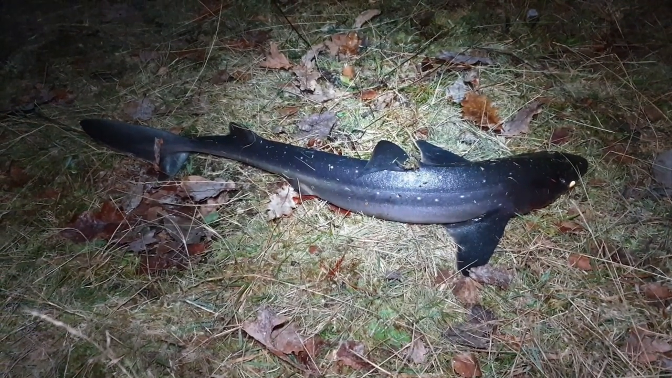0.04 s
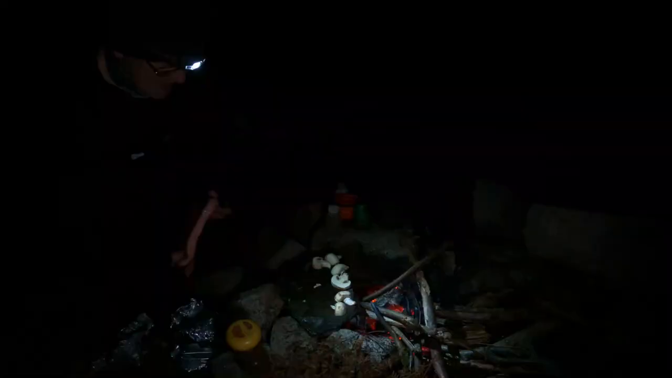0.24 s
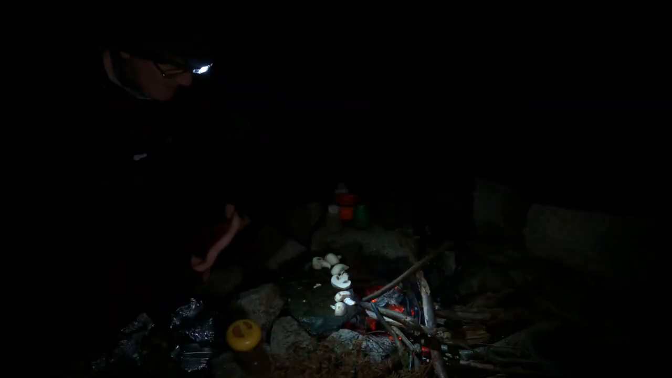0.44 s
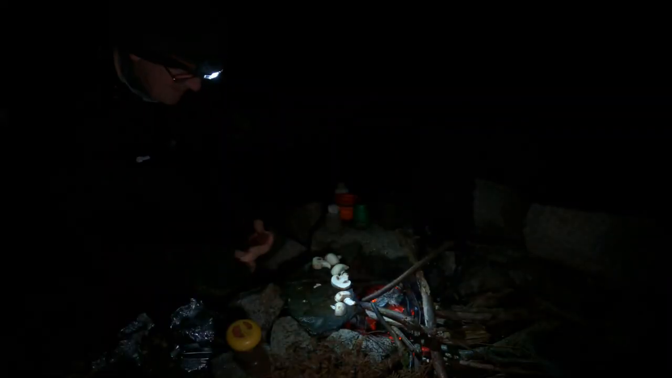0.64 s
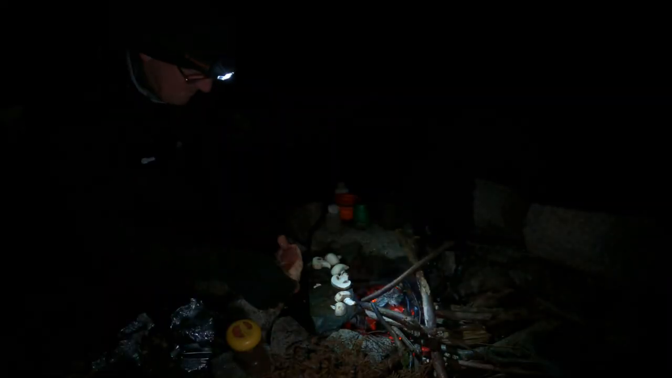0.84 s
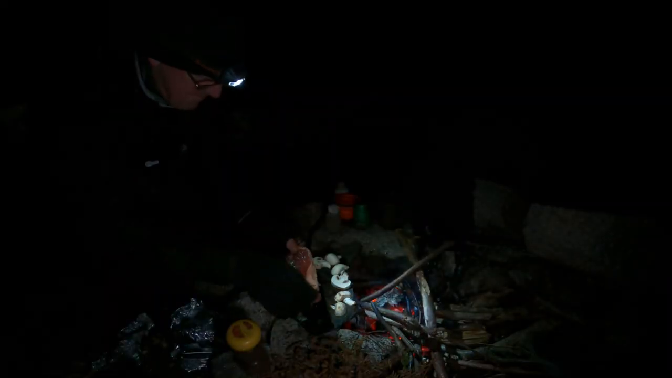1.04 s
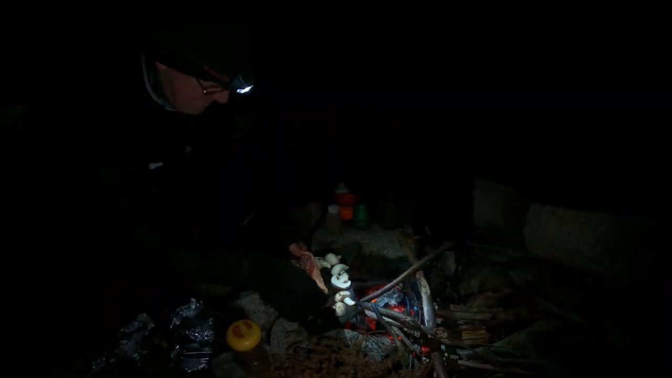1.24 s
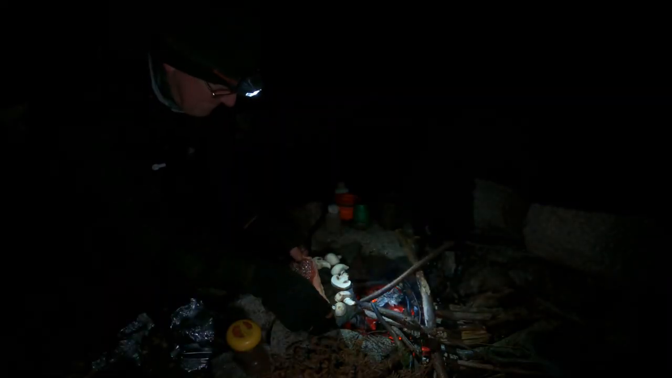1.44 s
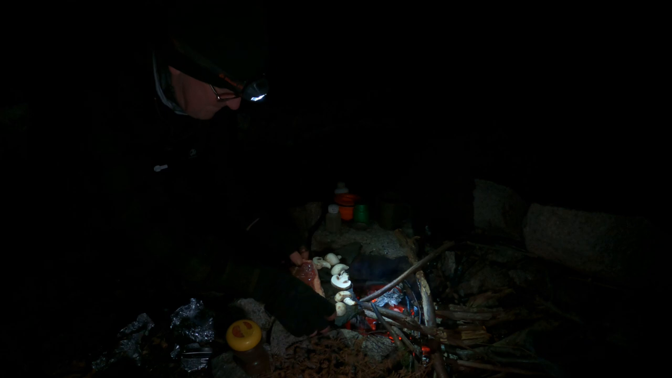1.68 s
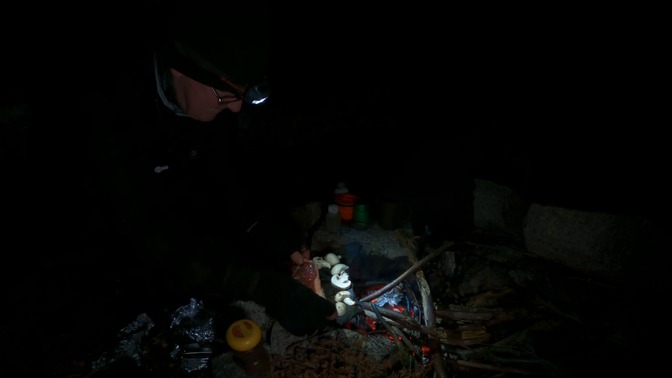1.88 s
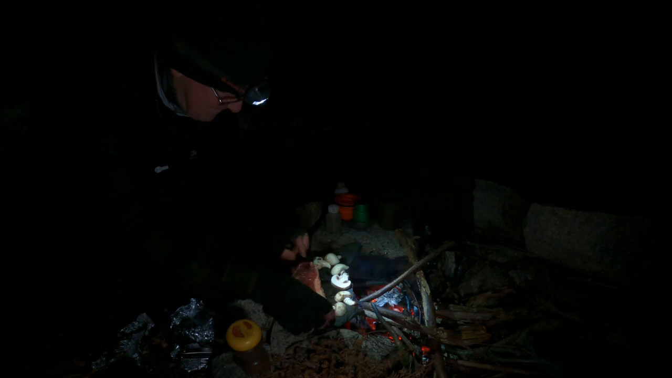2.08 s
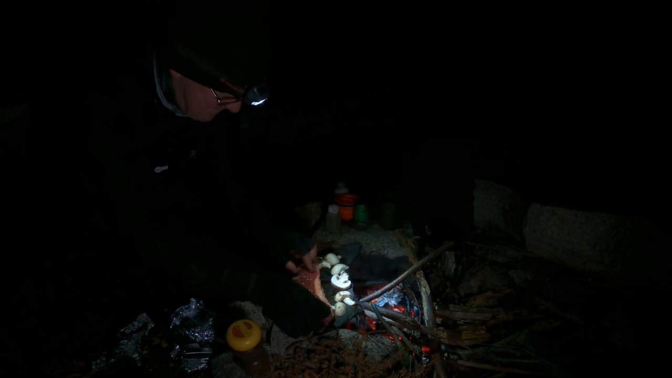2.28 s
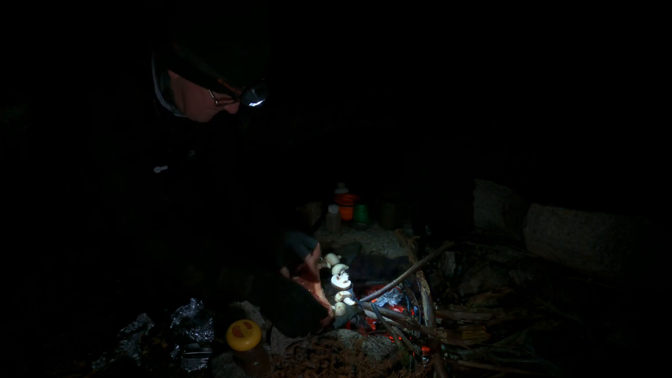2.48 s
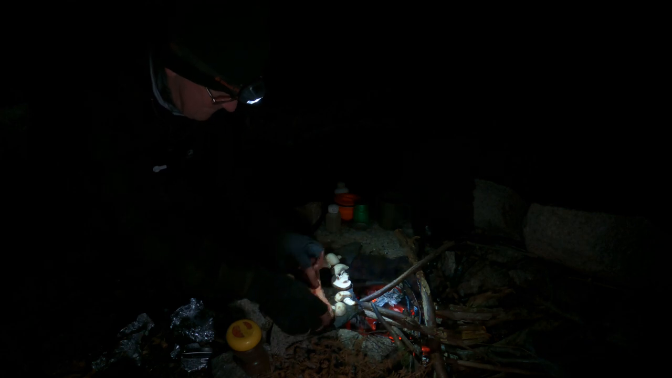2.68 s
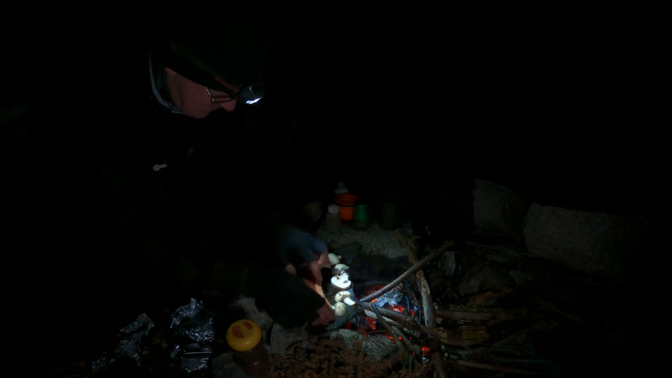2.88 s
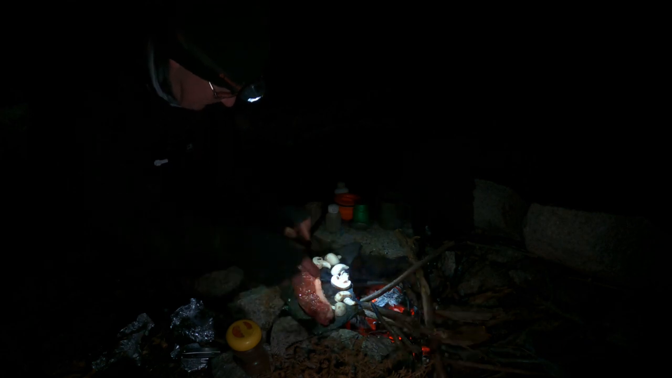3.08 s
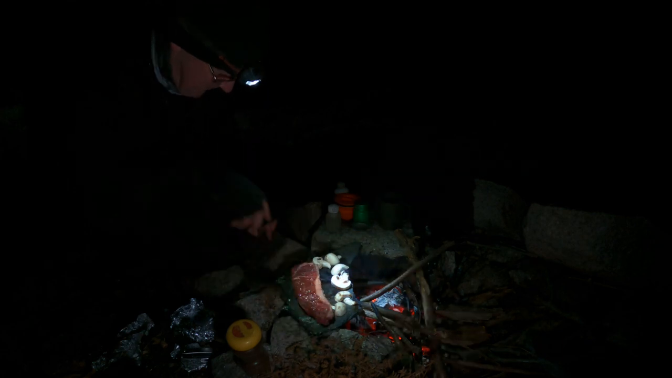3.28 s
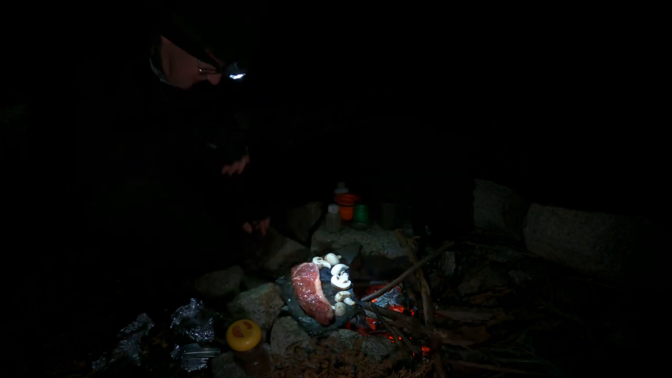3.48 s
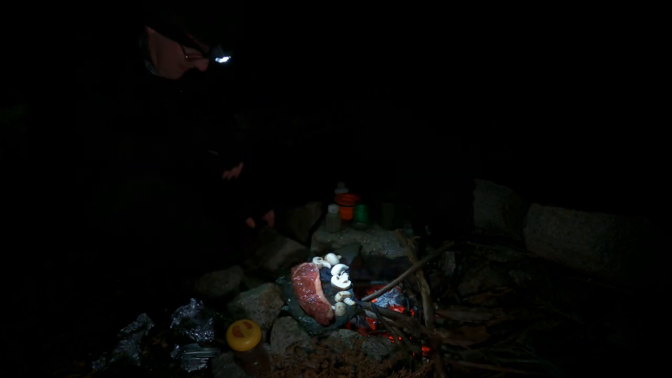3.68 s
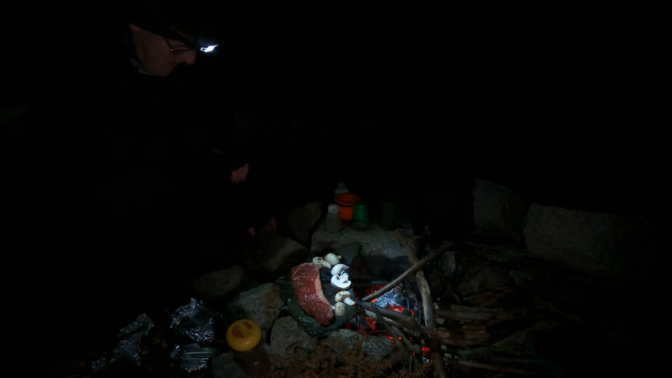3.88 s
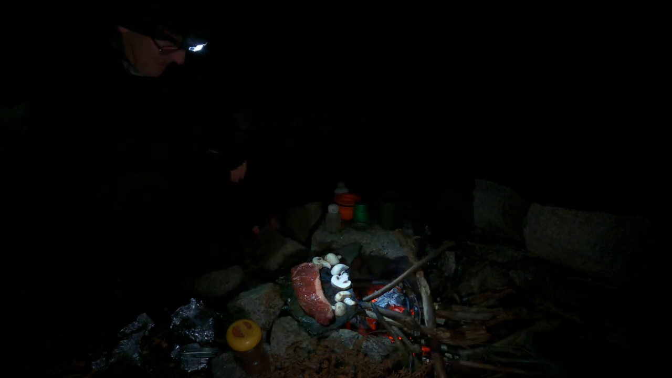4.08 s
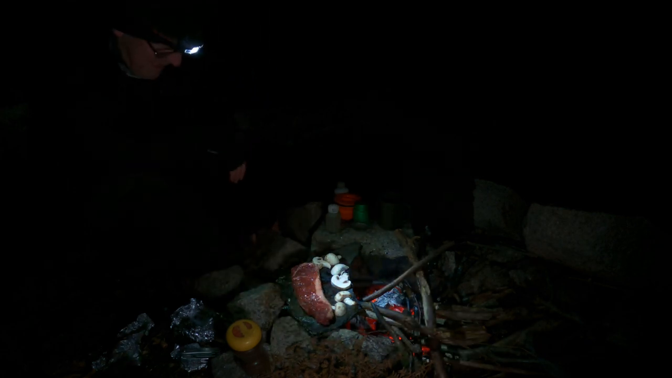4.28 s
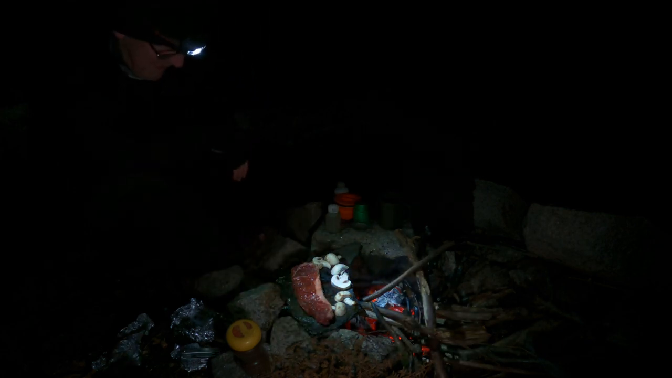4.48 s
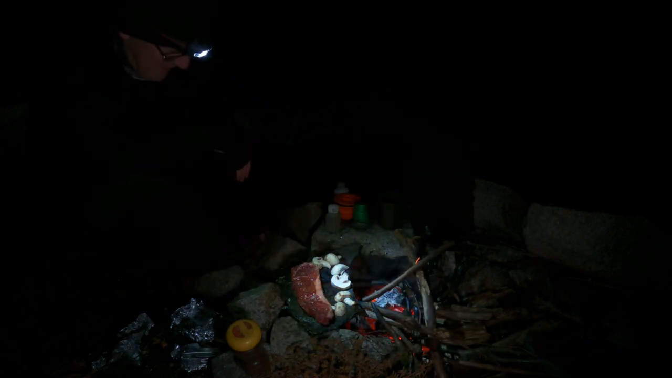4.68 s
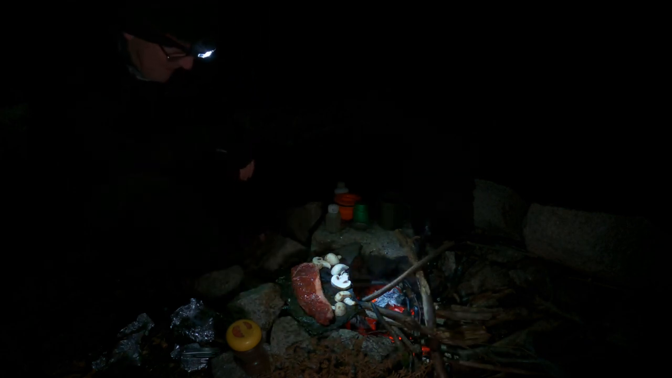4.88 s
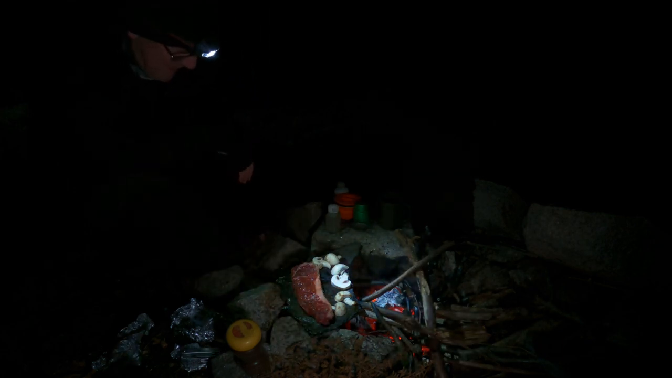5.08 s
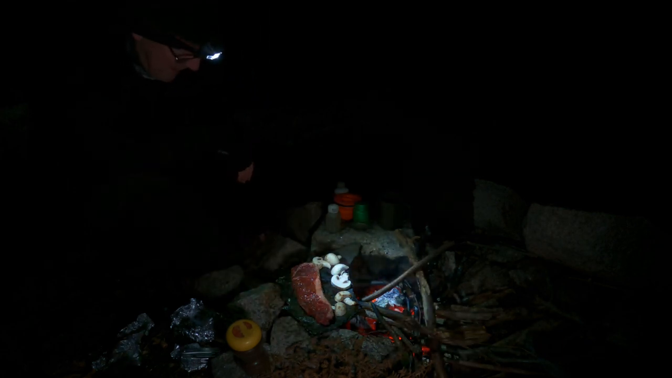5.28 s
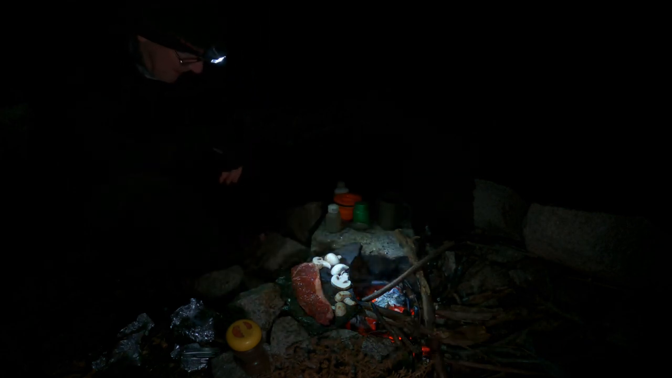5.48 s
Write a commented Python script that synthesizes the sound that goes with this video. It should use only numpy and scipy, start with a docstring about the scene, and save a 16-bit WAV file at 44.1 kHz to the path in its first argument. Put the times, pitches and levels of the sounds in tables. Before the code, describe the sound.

From 0 to 0.3 s there is only a faint hollow hiss with brief low hums and bumps. It cuts sharply to fine, steady mushroom fizz on hot slate beside low flames that flare into short wavering hums around 150-180 Hz, slightly to the right. A sleeve swishes from 0.4 to 1 s, with a soft knock at 0.48 and a fainter one at 1.37; the fizz dulls briefly around 1.35 as a hand passes. Small fat pops start near 1.6 and thicken. Around 2.0-2.4 s the steak goes down: steam flurries, sizzle swelling loud and bright, its narrow ringing sliding downward. It grows coarser, and ringing strengthens as fingers press near 2.95; a strong pop hits at 3.02. Dense spits, crackle and dry wood ticks continue. A low knock at 3.87 accompanies clothes rustling until about 4.8. Loud pops land at 4.92 and 5.18. Light wind rumbles occasionally; outdoors, close and dry.

```python
"""Night at a campfire: a faint hollow hiss over brief low hums and bumps, then mushrooms fizzing on hot slate by
droning flames. A sleeve swishes past, knocks fall now and then, and the first fat pops. A steak is lowered: bursts
of steam make its sizzle swell and coarsen, while a resonance in the gap beneath the meat drops in pitch. Spits,
small random pops and wood ticks, all brief transients, gather over it; near the end clothes rustle in filtered noise."""
import sys
import numpy as np
from scipy import signal
from scipy.fft import rfft, irfft
from scipy.io import wavfile

SR = 44100
rng = np.random.default_rng(int(sys.argv[2]) if len(sys.argv) > 2 else 0)


def master_out(mix):
    """Clip the mix to full scale and print it as 16-bit PCM to the path in sys.argv[1]."""
    frames = np.transpose(np.atleast_2d(mix))
    ceiling = np.clip(frames, -1, 1)
    pcm = np.round(ceiling * 32767).astype(np.int16)
    wavfile.write(sys.argv[1], SR, pcm)


N = 244314

FIRE_START_S = 0.314
# the steak is laid down gradually: half of it touches at LAID_S; half its surface water has boiled off at DRY_S
LAID_S, LAYING_S, DRY_S, DRYING_S = 2.176, 0.15, 2.44, 0.26


def from_db(db):
    """Logarithmic level: decibels to amplitude gain."""
    return 10 ** (np.asarray(db) / 20)


def rms_one(x):
    """Power normalisation: scaled to rms 1."""
    return x / np.sqrt(np.mean(x ** 2) + 1e-20)


def peak_one(x):
    """Peak normalisation: scaled to peak 1."""
    return x / np.abs(x).max()


def at_hz(points):
    """Interpolation on a logarithmic frequency axis: a table read at every bin of a padded transform."""
    hz, value = np.transpose(points)
    bins_hz = np.arange(N + 1) * SR / (2 * N)
    return np.interp(np.log(bins_hz + 1), np.log(hz), value)


def fade_in(start_s, length_s):
    """Linear envelope: a straight rise from 0 to 1."""
    return np.clip((np.arange(N) / SR - start_s) / length_s, 0, 1)


def step(centre_s, width_s):
    """Logistic envelope: a smooth S-shaped rise from 0 to 1."""
    return .5 + .5 * np.tanh((np.arange(N) / SR - centre_s) / (2 * width_s))


def bump(centre_s, half_length_s):
    """Gaussian envelope of height 1, down to 1/e at the half length."""
    return np.exp(-((np.arange(N) / SR - centre_s) / half_length_s) ** 2)


def swell(start_s, attack_s, hold_s, release_s):
    """Linear-segment envelope: attack, hold and release, of height 1."""
    return fade_in(start_s, attack_s) * (1 - fade_in(start_s + attack_s + hold_s, release_s))


def drift(rate):
    """Low-rate random modulation: straight lines between normal random knots, `rate` of them per second."""
    knots = rng.standard_normal(int(rate * N / SR) + 2)
    return np.interp(np.arange(N) / SR * rate, np.arange(len(knots)), knots)


def colour(x, spectrum):
    """Minimum-phase filtering: the cepstrum gives a causal filter with this spectrum; rms 1."""
    cepstrum = irfft(np.log(from_db(at_hz(spectrum))))
    response = np.exp(2 * rfft(cepstrum[:N], 2 * N))
    return rms_one(irfft(rfft(x, 2 * N) * response)[:, :N])


def resonance(x, hz, width_hz):
    """Damped resonance: a two-pole band-pass with gain 1 on top."""
    r = np.exp(-np.pi * width_hz / SR)
    zeros = np.array([1, 0, -1]) * (1 - r * r) / 2
    poles = [1, -2 * r * np.cos(2 * np.pi * hz / SR), r * r]
    return signal.lfilter(zeros, poles, x)


def gliding_resonance(x, hz, width_hz):
    """Heterodyne filtering: a one-pole low-pass carried along a moving centre frequency."""
    turn = np.exp(2j * np.pi * np.cumsum(hz) / SR)
    r = np.exp(-np.pi * width_hz / SR)
    return 2 * np.real(turn * signal.lfilter([1 - r], [1, -r], x / turn))


def stereo_noise(spectrum, side_db):
    """Partial coherence: coloured noise, partly different at the two microphone ports; rms 1."""
    mid, side = rng.standard_normal((2, N))
    return colour(mid + from_db(side_db) * side * [[1], [-1]], spectrum)


def wavering_tone(hz, waver, flutter_db):
    """Random frequency and amplitude modulation of a sine: a narrow, unsteady tone; rms 1."""
    phase = 2 * np.pi * np.cumsum(hz * (1 + waver * drift(32))) / SR
    return rms_one(from_db(flutter_db * drift(28)) * np.sin(phase))


# phase difference between the microphone ports: frequency_hz, left_leads_by_rad
LEAD = [(500, -0.71), (1500, -0.094), (2600, -0.54), (6000, -0.41), (10000, -0.4), (12000, -0.59)]


def at_ports(x):
    """Phase difference: direct sound from the slate reaches the two ports a little out of step."""
    return irfft(rfft(x, 2 * N) * np.exp(.5j * at_hz(LEAD) * [[1], [-1]]))[:, :N]


# coherence between the microphone ports: frequency_hz, likeness (0 to 1)
LIKENESS = [(150, 0.25), (500, 0.91), (1300, 0.89), (7000, 0.88), (11500, 0.99), (12100, 0.84),
            (12900, 0.25), (16000, 0.092)]


def among_stones(x, scatter_s):
    """Diffuse scattering: past the direct sound, stones and ground return a short tail, unlike at each port."""
    r = np.exp(-1 / (scatter_s * SR))
    envelope = np.sqrt(signal.lfilter([1 - r], [1, -r], x ** 2))
    tail = envelope * rng.standard_normal((2, N))
    alike = np.clip(at_hz(LIKENESS), 0, 1)
    direct = rfft(at_ports(x), 2 * N)
    return irfft(np.sqrt(alike) * direct + np.sqrt(1 - alike) * rfft(tail, 2 * N))[:, :N]


def bursts(per_s, spread_db, clump_db, hiss_db):
    """Clustered shot noise: tiny steam bursts, many small and few large, over a smooth hiss."""
    born = rng.random(N) < per_s * from_db(clump_db * drift(70)) / SR
    sizes = from_db(spread_db * np.minimum(rng.exponential(1, N), 6.5)) * rng.choice([-1, 1], N)
    # dividing by the root of the rate keeps the power even
    shots = rms_one(born * sizes / np.sqrt(per_s))
    return rms_one(shots + from_db(hiss_db) * rng.standard_normal(N))


def frying(per_s, spread_db, ring_db, ring_cycles):
    """Bubble resonance: some bursts are dry ticks, others ring for a few cycles at the pitch of their bubble."""
    ticks = bursts(per_s, spread_db, clump_db=3.0, hiss_db=-9)
    drops = bursts(per_s, spread_db, clump_db=2.5, hiss_db=-22)
    pitches = np.geomspace(1000, 12000, 16)
    dealt = rng.integers(0, len(pitches), N)
    rings = sum(resonance(drops * (dealt == k), hz, hz / ring_cycles) for k, hz in enumerate(pitches))
    return among_stones(ticks + from_db(ring_db) * rms_one(rings), scatter_s=0.0079)


# brief low hums and bumps under the opening hiss:
# centre_s, half_length_s, level_db (before the opening's balance and fade), pitch_hz
HUMS = [(0.094, 0.014, -60, 72), (0.19, 0.03, -70, 63), (0.12, 0.052, -71, 420), (0.294, 0.037, -65.5, 465)]


def hums_and_bumps():
    """Gaussian-windowed modulated sines: brief low hums and bumps."""
    out = 0
    for s, half_s, db, hz in HUMS:
        out = out + from_db(db) * bump(s, half_s) * wavering_tone(hz, waver=0.071, flutter_db=3)
    return out


# spectrum of the hollow hiss: frequency_hz, density_db (per Hz)
AIR_COLOUR = [(30, -16), (90, -4.5), (140, -15.5), (280, -15), (420, -8), (560, -14), (850, -25.5),
              (1300, -21.5), (1800, -3), (2650, -4), (3200, -10.5), (3520, -5.5), (4200, -21.5),
              (6200, -16), (7500, -41.5), (16000, -38)]


def opening():
    """Filtered noise and tones: a hollow hiss over hums and bumps until the fire; slightly louder on the left."""
    heard = fade_in(-0.24, 0.41) * (1 - fade_in(FIRE_START_S, 0.0092))
    hiss = from_db(-56.0) * stereo_noise(AIR_COLOUR, side_db=-3.0)
    return heard * (hiss + hums_and_bumps()) * from_db([[.6], [-.6]])


BREEZE_DB = -84.5   # wind between gusts
# gusts and short low thumps on the microphone, added to the breeze: centre_s, half_length_s, level_db
GUSTS_AND_THUMPS = [(0.11, 0.056, -86), (1.233, 0.06, -82), (1.487, 0.019, -66), (2.011, 0.09, -77),
                    (3.315, 0.17, -74), (3.853, 0.021, -68)]
# spectrum of the wind on the microphone: frequency_hz, density_db (per Hz)
WIND_COLOUR = [(20, 22), (45, 23.5), (90, -30), (140, -22), (400, -30)]


def breeze():
    """Turbulent pressure noise: a breeze with light gusts and a few low thumps on the microphone."""
    wind = from_db(BREEZE_DB) + sum(from_db(db) * bump(s, half_s) for s, half_s, db in GUSTS_AND_THUMPS)
    return wind * stereo_noise(WIND_COLOUR, side_db=-11)


MUSHROOM_DB, MUSHROOM_RISE_DB_PER_S = -53.5, 0.64   # fizz at time 0 and its slow rise, before the hand passes
# spectrum of the mushrooms' fizz: frequency_hz, density_db (per Hz)
MUSHROOM_COLOUR = [(200, -17.5), (500, -12.5), (900, -14.5), (1300, -9), (1800, -7), (2400, -8), (3000, -4),
                   (3700, 3), (4700, 0), (5600, -4.5), (7200, -8), (8500, -14.5), (12200, -21.5),
                   (14000, -31.5)]


def mushrooms():
    """Dense shot noise: a steady fine fizz that slowly gains heat."""
    level_db = MUSHROOM_DB + MUSHROOM_RISE_DB_PER_S * np.arange(N) / SR
    fizz = frying(9000, spread_db=3.5, ring_db=-11.5, ring_cycles=1.2)
    return from_db(level_db) * colour(fizz, MUSHROOM_COLOUR)


# the cook's hand passes over the slate: centre_s, half_length_s, share_lost (0 to 1, at band centre), centre_hz
HAND_PASSES = [(0.32, 0.13, 0.45, 2600), (1.35, 0.18, 0.62, 2400), (2.497, 0.85, 0.43, 1980)]


def behind_hand(x):
    """Destructive interference: at each pass the reflection off the hand cancels part of the middle band."""
    return x - sum(share * bump(s, half_s) * resonance(x, hz, width_hz=1250) for s, half_s, share, hz in HAND_PASSES)


WISP_WIDTH_HZ, WISP_WAVER = 40, 0.064   # nominal bandwidth; spread of the pitch (share)
# gliding wisps off the drone: start_s, length_s, level_db (before the flames' balance), first_hz, last_hz
WISPS = [(0.863, 0.17, -75, 200, 276), (1.229, 0.11, -68.5, 196, 146), (1.319, 0.21, -75.5, 230.6, 400),
         (1.521, 0.13, -67, 140, 244), (2.432, 0.11, -72, 185, 215), (2.53, 0.127, -72, 205, 320),
         (4.538, 0.083, -66.5, 159.7, 219)]


def wisps():
    """Narrow-band noise on a gliding carrier: each wisp bends unsteadily away from the drone."""
    out = 0
    for s, length_s, db, first_hz, last_hz in WISPS:
        hz = (first_hz + (last_hz - first_hz) * fade_in(s, length_s)) * (1 + WISP_WAVER * drift(30))
        flutter = drift(2 * WISP_WIDTH_HZ) + 1j * drift(2 * WISP_WIDTH_HZ)
        band = rms_one(np.real(flutter * np.exp(2j * np.pi * np.cumsum(hz) / SR)))
        out = out + from_db(db) * bump(s + length_s / 2, length_s / 2) * band
    return out


FLAME_DB = -70   # drone between flares, before its balance
FLARE_ATTACK_S, FLARE_RELEASE_S = 0.036, 0.063
FLARE_WAVER, FLARE_FLUTTER_DB = 0.075, 2.5   # spread of a flare's pitch (share) and level
FLARE_TONE_DB, FLARE_NOISE_DB = 1.5, -9.5   # a flare's tone and the rush around it, against its listed level
# spectrum of the flames: frequency_hz, density_db (per Hz)
FLAME_COLOUR = [(20, -18), (100, -46.5), (130, -10), (152, 0), (176, -4.5), (205, -2), (250, -11),
                (340, -12.5), (600, -32), (1500, -58)]
# the flames flare up: start_s, hold_s, level_db (reference for tone and rush), pitch_hz
FLARES = [(0.764, 0.045, -63, 152.8), (0.824, 0.045, -62.5, 172), (1.91, 0.13, -67, 162),
          (2.63, 0.0097, -62.5, 160), (2.898, 0.13, -66, 176), (3.09, 0.18, -62.5, 166),
          (3.343, 0.19, -64.5, 168.4), (3.681, 0.18, -62, 163.8), (3.93, 0.075, -64.5, 172.6),
          (4.136, 0.036, -66, 162.9), (4.536, 0.2, -63, 177.8), (4.773, 0.11, -65, 160.1),
          (5.062, 0.12, -63, 165.2)]


def flames():
    """Combustion noise: a low rumble that sings a narrow wavering tone when it flares; stronger on the right."""
    powers = []
    for s, hold_s, db, _ in FLARES:
        powers.append((from_db(db) * swell(s, FLARE_ATTACK_S, hold_s, FLARE_RELEASE_S)) ** 2)
    powers = np.array(powers) + 1e-14
    power = powers.sum(axis=0)
    # overlapping flares share one pitch, weighted by power
    hz = np.array(FLARES)[:, 3] @ powers / power
    tone = from_db(FLARE_TONE_DB) * wavering_tone(hz, FLARE_WAVER, FLARE_FLUTTER_DB) * from_db([[-12], [0]])
    rush = from_db(FLARE_NOISE_DB) * stereo_noise(FLAME_COLOUR, side_db=0.5)
    rumble = from_db(FLAME_DB + 1.5 * drift(10.0)) * stereo_noise(FLAME_COLOUR, side_db=-4.0)
    return np.sqrt(power) * (tone + rush) + (rumble + wisps()) * from_db([[-5.0], [2.5]])


# spectrum of the sleeve's swish: frequency_hz, density_db (per Hz)
SLEEVE_COLOUR = [(150, -36), (300, -8), (600, -4.5), (950, -8), (1300, 4), (1900, 3.5), (2600, -1.5),
                 (4000, -2.5), (8000, -9), (14000, -36)]
# spectrum of the clothes' rustle: frequency_hz, density_db (per Hz)
RUSTLE_COLOUR = [(30, -15), (100, -15), (250, -1.5), (500, -3), (900, -2), (3000, -32)]
# soft knocks: start_s, level_db (before onset smoothing), pitch_hz, t60_s
KNOCKS = [(0.479, -48.5, 263, 0.053), (1.369, -54, 275, 0.049), (3.872, -49.5, 160, 0.072),
          (3.901, -65, 75, 0.12)]


def cook():
    """Friction noise and damped modes: a sleeve swishes on reaching in, clothes rustle in fits, knocks fall."""
    reach = from_db(-55.0) * swell(0.37, attack_s=0.18, hold_s=0.13, release_s=0.34)
    sit_back = from_db(-63.0 + 3.8 * drift(45)) * swell(3.82, attack_s=0.069, hold_s=0.11, release_s=0.76)
    swish = reach * stereo_noise(SLEEVE_COLOUR, side_db=-12)
    out = swish + sit_back * stereo_noise(RUSTLE_COLOUR, side_db=-12.0)
    for s, peak_db, hz, t60 in KNOCKS:
        t = np.maximum(np.arange(N) / SR - s, 0)
        decay = from_db(peak_db - 60 * np.minimum(t / t60, 2))
        out = out + decay * np.sin(2 * np.pi * hz * t) * fade_in(s, 0.0024)
    return out


POP_PUFF_S, POP_CRACK_S = 0.00042, 0.00043   # decays of the puff of steam and of the crack
POP_BODY_DB = -15.5   # broad body an octave under the ring
POP_SCATTER_DB, POP_SCATTER_S = -27.5, 0.0038   # tail off the stones
POP_ECHO_S, POP_ECHO_DB = 0.00173, -10   # the stones beside the slate return each pop once, inverted
POP_LOW_HZ, POP_TOP_HZ = 724, 11240   # the band that a pop fills


def pop(hz, cycles, crack_db, puff_db):
    """Impulse response: a crack and a puff of steam excite a damped ring and body, then echo and scatter; peak 1."""
    t = np.arange(SR // 25) / SR
    tail = from_db(puff_db) * np.exp(-t / POP_PUFF_S) + from_db(POP_SCATTER_DB) * np.exp(-t / POP_SCATTER_S)
    kick = tail * rng.standard_normal(len(t))
    kick[0] = 1
    ring = resonance(kick, hz, 2 * hz / max(cycles, 1))
    body = resonance(kick, hz / 2, hz / 2)
    crack = signal.lfilter([1, -1], [1, -0.4], kick * np.exp(-t / POP_CRACK_S))
    # the crack counts double
    x = peak_one(ring) + from_db(POP_BODY_DB) * peak_one(body) + 2 * from_db(crack_db) * peak_one(crack)
    x = x - from_db(POP_ECHO_DB) * np.interp(t - POP_ECHO_S, t, x, left=0)
    x = signal.sosfilt(signal.butter(2, POP_LOW_HZ, "high", fs=SR, output="sos"), x)
    return peak_one(signal.sosfilt(signal.butter(6, min(POP_TOP_HZ, SR / 3), fs=SR, output="sos"), x))


SMALL_POP_DB, SMALL_POP_SPREAD_DB = -32.5, 2.5   # peak at full contact, and how far it strays either way
SMALL_POP_LOW_HZ, SMALL_POP_HIGH_HZ = 3200, 7200


def small_pops(count, first_s, cycles, crack_db, puff_db):
    """Random point process: rows like those of POPS, louder as more of the meat touches."""
    when, size, pitch = rng.random((count, 3)).T
    s = first_s + (N / SR - first_s) * when
    contact = np.interp(s * SR, np.arange(N), step(LAID_S, LAYING_S))
    peak_db = SMALL_POP_DB + SMALL_POP_SPREAD_DB * (2 * size - 1) - 7 * (1 - contact)
    hz = SMALL_POP_LOW_HZ * (SMALL_POP_HIGH_HZ / SMALL_POP_LOW_HZ) ** pitch
    return [(*row, cycles, crack_db, puff_db) for row in zip(s, peak_db, hz)]


# the resonance drops as the steak is laid down, then sags as the meat settles
GAP_OPEN_HZ, GAP_LAID_HZ, GAP_SAG_HZ, SETTLE_S, SETTLING_S = 3780, 2770, 187, 3.4, 0.33
GAP_WIDTH_HZ = 140


def gap_pitch():
    """Cavity resonance: the gap under the meat rings lower as the steak is laid down and settles."""
    laid_hz = GAP_OPEN_HZ + (GAP_LAID_HZ - GAP_OPEN_HZ) * step(LAID_S, LAYING_S)
    return laid_hz - GAP_SAG_HZ * step(SETTLE_S, SETTLING_S)


POP_GAP_DB = -13   # how much a pop rings the gap under the meat
TICK_HZ, TICK_CYCLES, TICK_CRACK_DB, TICK_PUFF_DB = 3830, 1.1, -12, -23   # crack before pop() doubles it
# loud spits of fat and ember pops: start_s, level_db (peak, before the gap's ring), pitch_hz,
# ring (cycles), crack_db (against the ring, before pop() doubles it), puff_db (steam, against the first impulse)
POPS = [(0.7994, -37, 3900, 11, -20, -14), (1.5549, -39, 4300, 2.5, -16, -12),
        (1.6305, -32.5, 7000, 1.5, -5, -5), (1.6547, -29, 7260, 5.2, -18, 0),
        (1.805, -30, 4170, 4.6, -18, -5), (1.9222, -33, 4380, 5.6, -16, -12.5),
        (1.9788, -28.5, 4370, 6.8, -20, -7), (2.0147, -20.5, 6400, 8.5, -24.5, -11.5),
        (2.084, -27, 5000, 1.6, -9, -20), (2.3085, -25, 5600, 6, -24, -8), (2.4328, -24, 4900, 7.5, -28, 0),
        (2.4344, -23, 5500, 9.9, -28, -4), (2.4368, -28, 4000, 3, -24, -15),
        (2.4989, -26.5, 7700, 18, -28, -14), (2.5145, -30, 2900, 2.8, -6, -19),
        (2.5713, -34, 4000, 2, -14, -12), (2.7526, -26, 5000, 3, -18, -12),
        (2.7923, -28, 4130, 4.5, -18, -14), (3.0200, -17, 5200, 3.5, -12, -10),
        (3.064, -29.5, 6260, 5.3, -17, -6), (3.0974, -29.5, 3120, 7, -1, 4), (3.3131, -28, 2690, 5, -8, -3),
        (3.3881, -26.5, 3990, 1.5, -6, -13), (3.4148, -29, 3000, 10, -14, -8),
        (3.4315, -29.5, 4500, 1.5, -12, -16), (3.4332, -29, 2580, 5, -17, -14),
        (3.5582, -26, 3100, 2.6, -10, -26), (3.7008, -22.3, 4410, 6.3, -24, -8),
        (3.7795, -30, 2750, 5.4, -18, -15), (3.8695, -25.5, 2600, 2.6, -14, -14),
        (3.8952, -30, 2700, 3.7, -18, -21), (3.9697, -24, 2600, 5.2, -26, -12),
        (4.0724, -23, 3040, 1.1, -18, -18), (4.1341, -29, 2900, 5.4, -22, -12),
        (4.5097, -24, 2520, 5.3, -24, -18), (4.912, -26, 2500, 2.7, -18, -12),
        (4.9193, -18.5, 2670, 3.2, -28, -10), (5.1822, -14.8, 2560, 4.9, -25, -19)]
# dry ticks of burning wood: start_s, level_db (peak, before the gap's ring)
TICKS = [(2.8561, -26), (3.017, -27), (3.1414, -30), (3.1476, -27), (3.183, -29), (3.242, -25.5),
         (3.7162, -25), (3.837, -32), (4.0604, -28), (4.2506, -26.5), (4.5525, -28), (4.7639, -24),
         (4.9935, -26.5)]


def pops():
    """Superposed impulse responses: fat pops, wood ticks and small pops; all ring the gap a little."""
    rows = list(POPS) + [(s, db, TICK_HZ, TICK_CYCLES, TICK_CRACK_DB, TICK_PUFF_DB) for s, db in TICKS]
    rows += small_pops(count=70, first_s=1.7, cycles=6.4, crack_db=-18, puff_db=-9)
    out = np.zeros(N + SR)
    for s, peak_db, hz, cycles, crack_db, puff_db in rows:
        x = pop(hz, cycles, crack_db, puff_db)
        at = round(s * SR)
        out[at:at + len(x)] += from_db(peak_db) * x
    out = out[:N]
    return at_ports(out + from_db(POP_GAP_DB) * gliding_resonance(out, gap_pitch(), GAP_WIDTH_HZ))


# spectrum of the sizzle and of its flurries: frequency_hz, density_db (per Hz)
STEAK_COLOUR = [(150, -44), (450, -20.5), (750, -12), (1100, -9), (1500, -3), (2400, 1.5), (4000, 1),
                (5300, -1), (6600, 1), (7600, -3), (8300, -7), (12000, -13.5), (13500, -19.5), (15700, -33)]
FLASH_HZ, FLASH_WIDTH_HZ = 5200, 2000   # centre and width of the larger bubbles' band
# flurries as surface water flashes off: centre_s, half_length_s, level_db (against the sizzle)
FLASHES = [(1.8, 0.021, 2), (1.7, 0.0081, -4), (2.476, 0.011, -9), (2.565, 0.021, -5), (2.52, 0.25, -6.5)]


def flash():
    """Flash boiling: flurries of sparser, larger bubbles as each part of the wet meat meets the slate."""
    flurry = among_stones(bursts(900, spread_db=4.0, clump_db=2.5, hiss_db=-22), scatter_s=0.004)
    ringing = resonance(colour(flurry, STEAK_COLOUR), FLASH_HZ, FLASH_WIDTH_HZ)
    return sum(from_db(db) * bump(s, half_s) for s, half_s, db in FLASHES) * rms_one(ringing)


def droplets(per_s, spread_db, puff_s):
    """Exponential decay of noise: each droplet flashes into a puff of steam that dies in milliseconds."""
    energy = (rng.random(N) < per_s / SR) * from_db(spread_db * np.minimum(rng.exponential(1, N), 3)) ** 2
    dying = signal.lfilter([1], [1, -np.exp(-2 / (puff_s * SR))], energy + 1e-18)
    return among_stones(rms_one(np.sqrt(dying) * rng.standard_normal(N)), scatter_s=0.0084)


CRACKLE_PER_S = 380   # before clumping
# spectrum of crackle and spitting droplets: frequency_hz, density_db (per Hz)
SPIT_COLOUR = [(500, -42), (2000, -8), (4600, 2.5), (7000, -3.5), (8500, -6), (12000, -12), (15500, -44.5)]


def crackle(spread_db, clump_db):
    """Sparse shot noise: needle-sharp snaps of fat, in uneven flurries."""
    born = rng.random(N) < CRACKLE_PER_S * from_db(clump_db * drift(25)) / SR
    sizes = from_db(spread_db * np.minimum(rng.exponential(1, N), 2)) * rng.choice([-1, 1], N)
    return colour(among_stones(born * sizes + 1e-9, scatter_s=0.003), SPIT_COLOUR)


# sizzle at full contact before its resonances; extra while wet; slow loss
STEAK_DB, WET_DB, COOLING_DB_PER_S = -44.5, 3, 0.55
BURSTS_PER_S = 6000   # times contact plus 0.2, before clumping
# low-mid emphasis as the bubbles grow: at LAID_S if dry, its growth, and its change while the surface is wet
COARSE_DB, COARSE_DB_PER_S, COARSE_WET_DB = -2, 1.5, -4
SPIT_DB, SPIT_FIRST_TOUCH_DB = -15.5, 12.5   # droplets against the sizzle; extra while little meat touches
CRACKLE_DB = -13   # against the sizzle
GAP_DB, GAP_WET_DB = 2.5, -7   # strength of the gap's resonance, and its change while the surface is wet
GAP_FLICKER_DB, GAP_WAVER = 1.2, 0.004   # steam escapes in fits: spread of strength and of pitch (share)
PRESS_S, PRESS_LENGTH_S, PRESS_DB = 2.95, 0.18, 7   # fingers press the meat down and the gap rings harder
# hollows between the stones: pitch_hz, width_hz, level_db (gain on top, added to the sizzle)
HOLLOWS = [(1015, 88, -7.5), (1415, 144, -4.5), (1820, 130, -7), (3150, 83, -2.5), (3650, 74, -24),
           (4600, 92, -4.5)]


def steak():
    """Nucleate boiling: sizzle power follows contact area; bubbles grow with time, and the gap rings ever lower."""
    contact = step(LAID_S, LAYING_S)
    wet = 1 - step(DRY_S, DRYING_S)
    since_s = np.arange(N) / SR - LAID_S
    sizzle = frying(BURSTS_PER_S * (contact + 0.2), spread_db=3.0, ring_db=-5.0, ring_cycles=3.0)
    x = colour(sizzle, STEAK_COLOUR)
    coarse_db = COARSE_DB + COARSE_DB_PER_S * since_s + COARSE_WET_DB * wet
    low_mids = signal.sosfilt(signal.butter(1, 2300, fs=SR, output="sos"), x)
    x = x + (from_db(coarse_db) - 1) * low_mids
    spit = colour(droplets(per_s=260, spread_db=6.5, puff_s=0.0016), SPIT_COLOUR)
    x = x + from_db(SPIT_DB + SPIT_FIRST_TOUCH_DB * (1 - contact)) * spit
    x = x + flash() + from_db(CRACKLE_DB) * crackle(spread_db=5.0, clump_db=5.5)
    gap_db = GAP_DB + GAP_WET_DB * wet + PRESS_DB * bump(PRESS_S, PRESS_LENGTH_S) + GAP_FLICKER_DB * drift(35)
    gap_hz = gap_pitch() * (1 + GAP_WAVER * drift(22.12))
    whistle = from_db(gap_db) * gliding_resonance(x, gap_hz, GAP_WIDTH_HZ)
    hollows = sum(from_db(db) * resonance(x, hz, width) for hz, width, db in HOLLOWS)
    level_db = STEAK_DB + WET_DB * wet - COOLING_DB_PER_S * since_s
    return (x + whistle + hollows) * np.sqrt(contact) * from_db(level_db)


def scene():
    """Linear superposition: slate and flames come in together, over opening, breeze and the cook's movements."""
    slate = (behind_hand(mushrooms() + steak()) + pops()) * from_db([[-.3], [.3]])
    return (slate + flames()) * fade_in(FIRE_START_S, 0.0035) + cook() + opening() + breeze()


CUTOFF_HZ = 15600


def record(dry):
    """Band limiting: an elliptic low-pass cuts the top steeply."""
    return signal.sosfilt(signal.ellip(10, .1, 70, CUTOFF_HZ, fs=SR, output="sos"), dry)


dry = scene()
out = record(dry)
master_out(out)
```